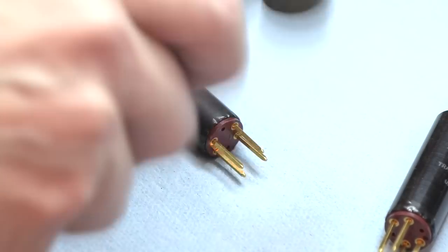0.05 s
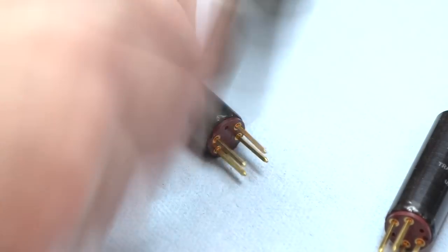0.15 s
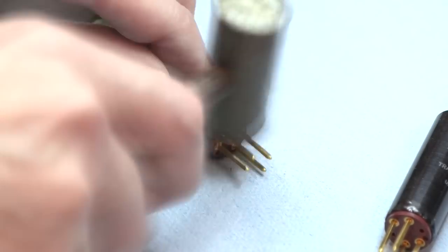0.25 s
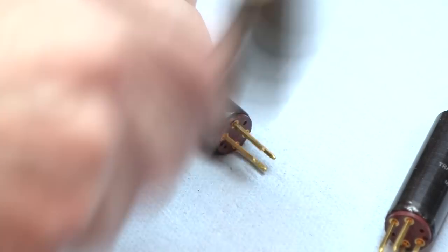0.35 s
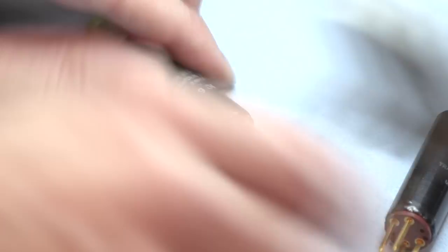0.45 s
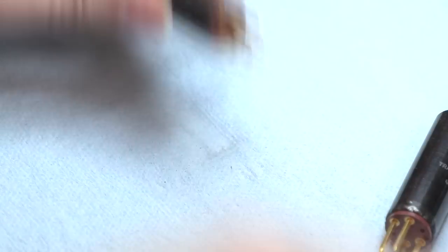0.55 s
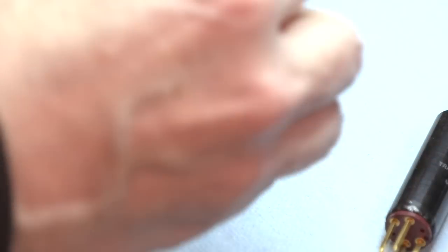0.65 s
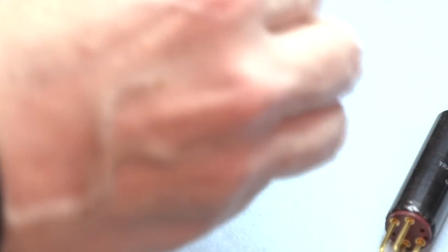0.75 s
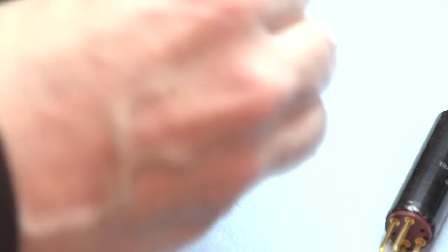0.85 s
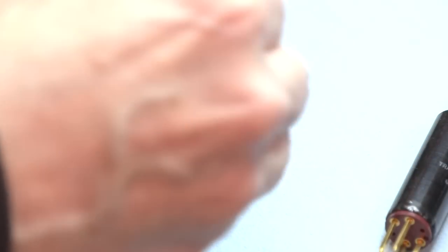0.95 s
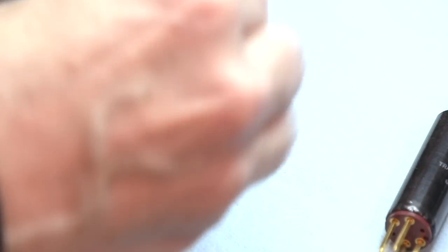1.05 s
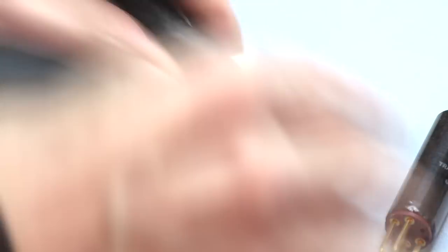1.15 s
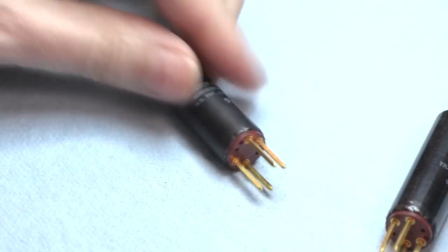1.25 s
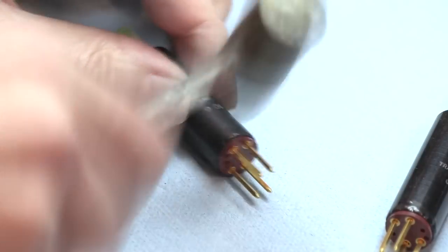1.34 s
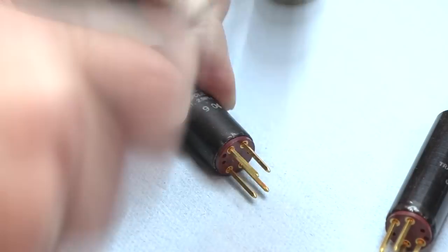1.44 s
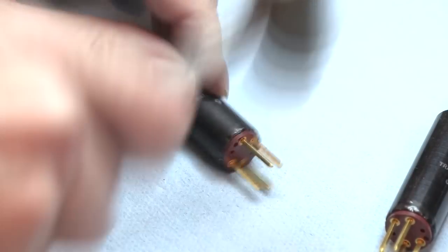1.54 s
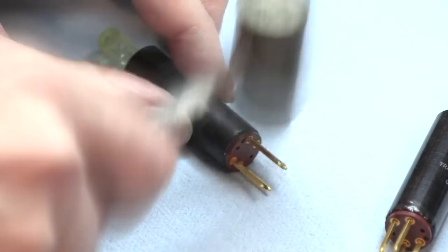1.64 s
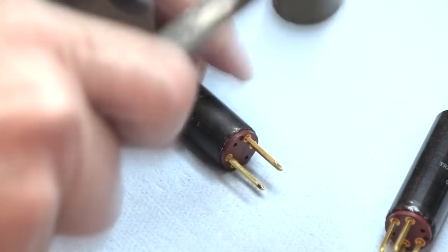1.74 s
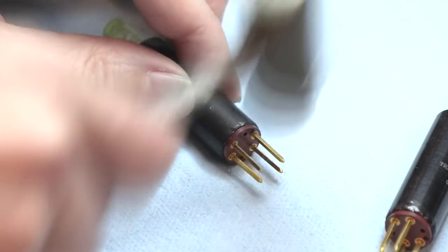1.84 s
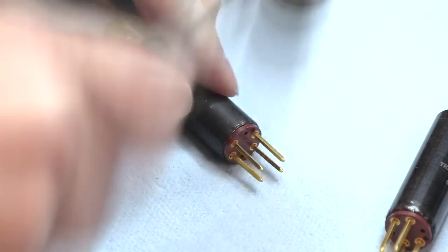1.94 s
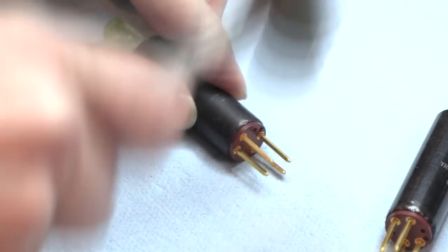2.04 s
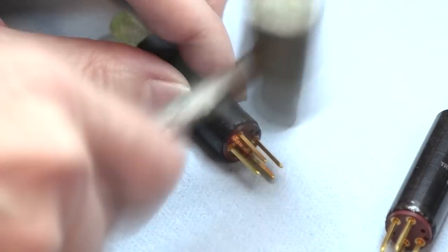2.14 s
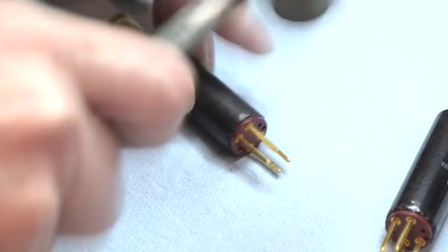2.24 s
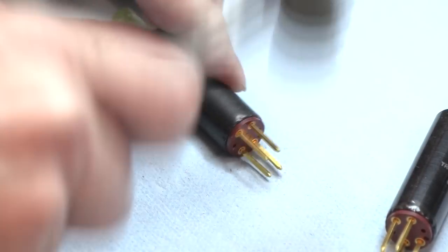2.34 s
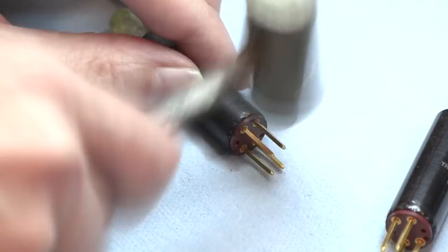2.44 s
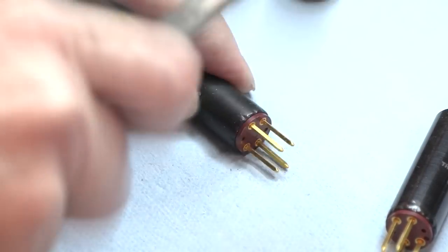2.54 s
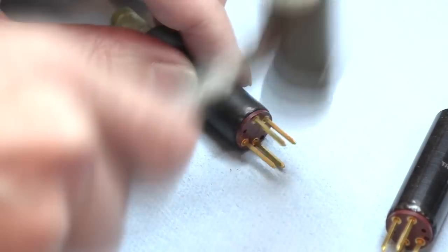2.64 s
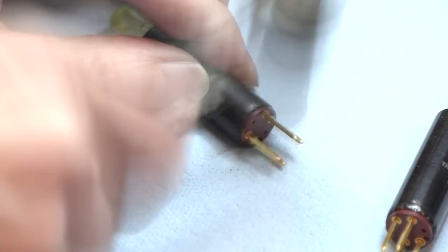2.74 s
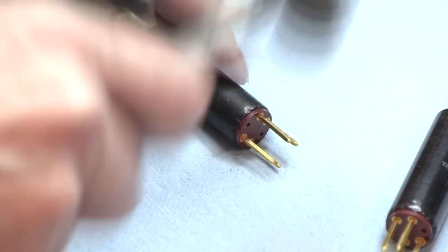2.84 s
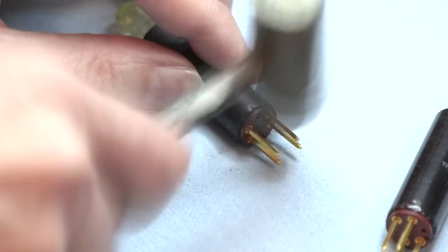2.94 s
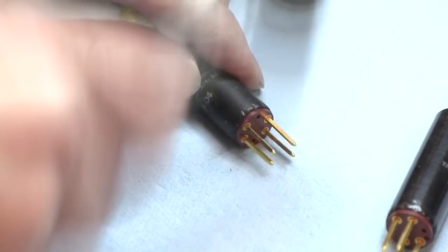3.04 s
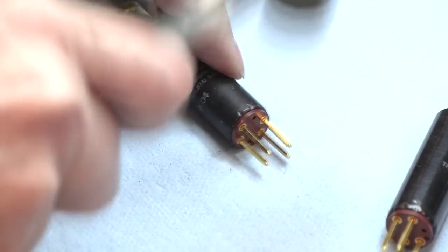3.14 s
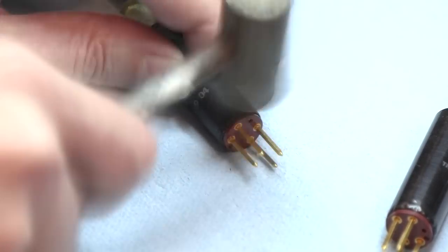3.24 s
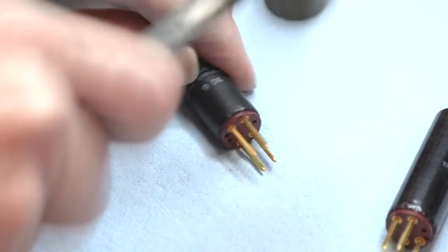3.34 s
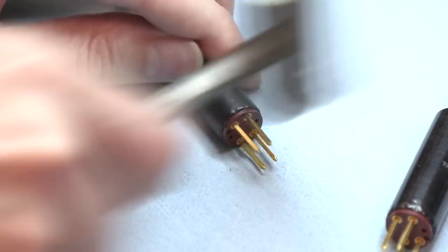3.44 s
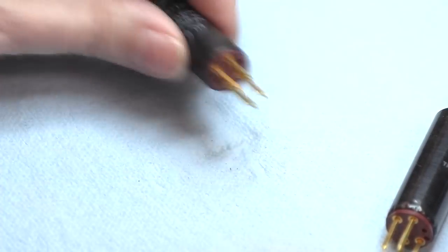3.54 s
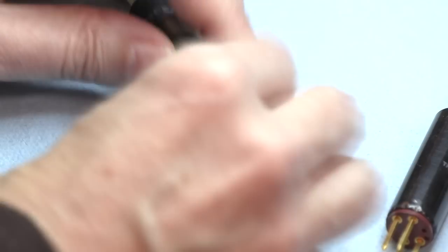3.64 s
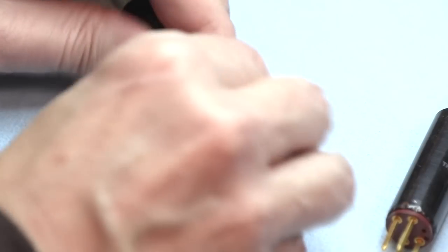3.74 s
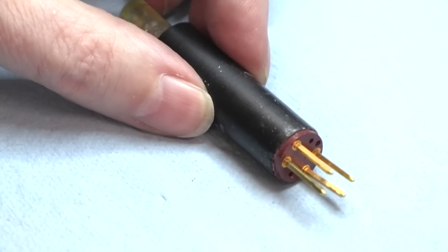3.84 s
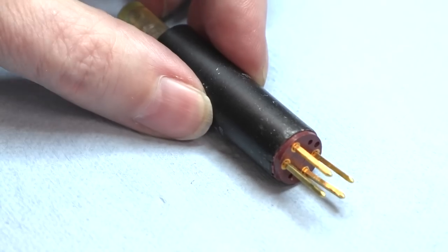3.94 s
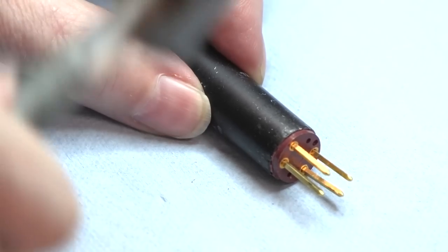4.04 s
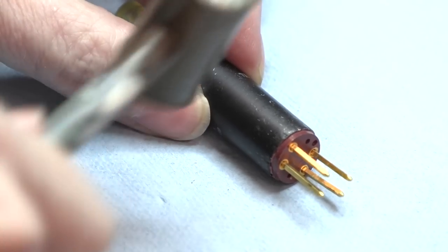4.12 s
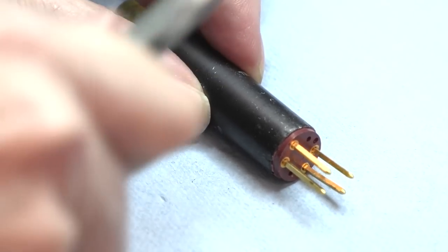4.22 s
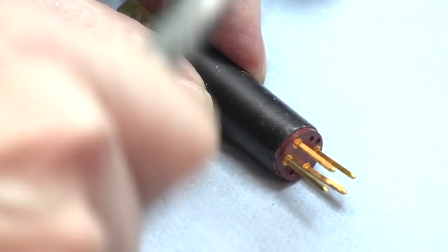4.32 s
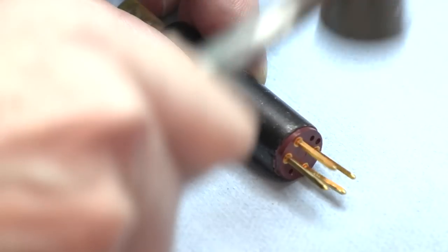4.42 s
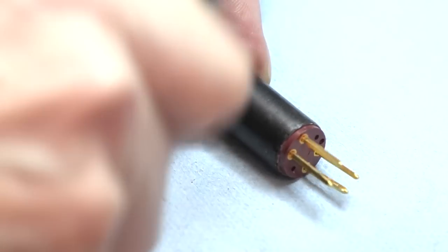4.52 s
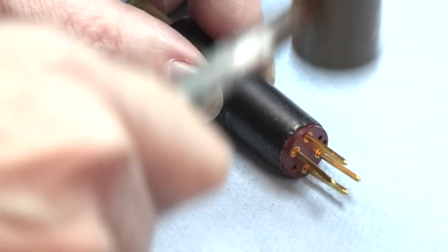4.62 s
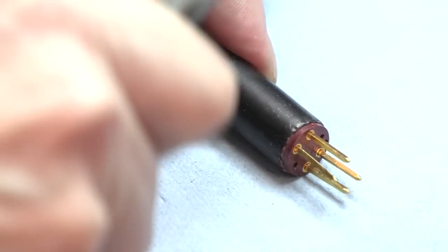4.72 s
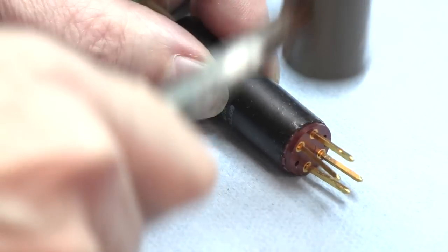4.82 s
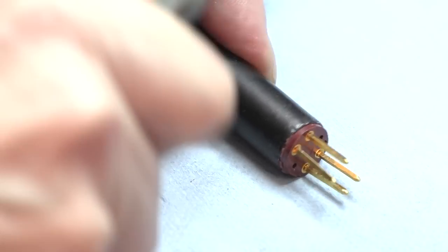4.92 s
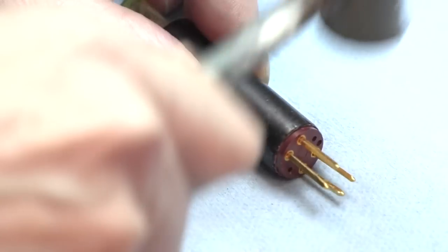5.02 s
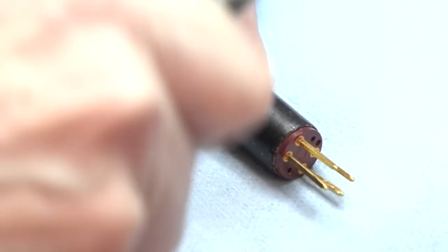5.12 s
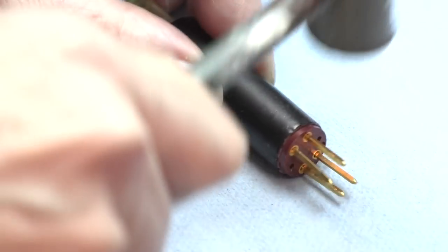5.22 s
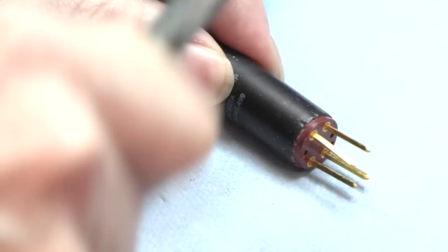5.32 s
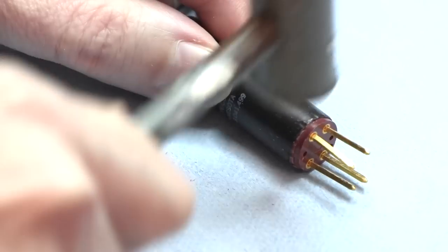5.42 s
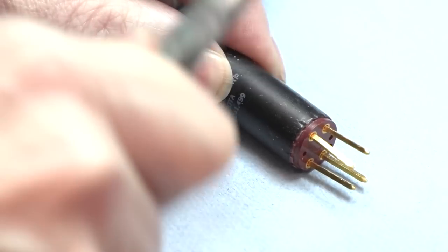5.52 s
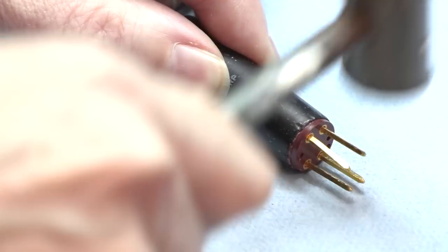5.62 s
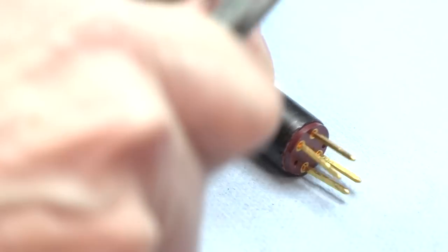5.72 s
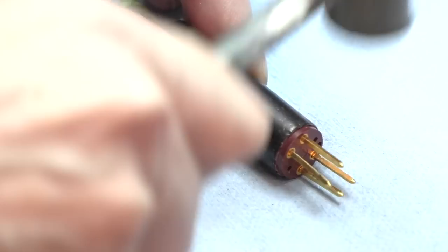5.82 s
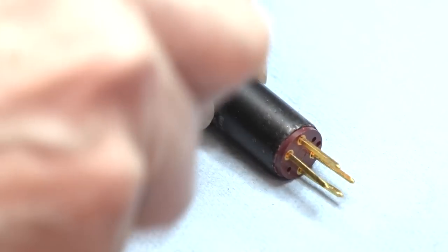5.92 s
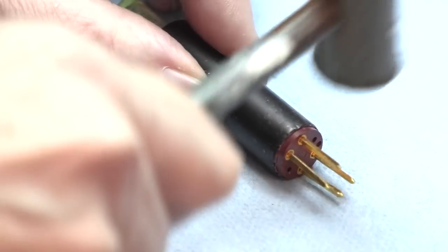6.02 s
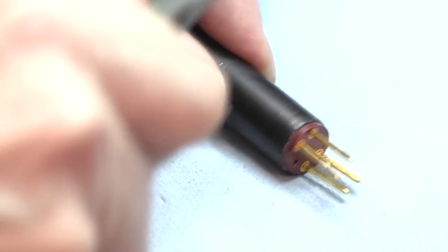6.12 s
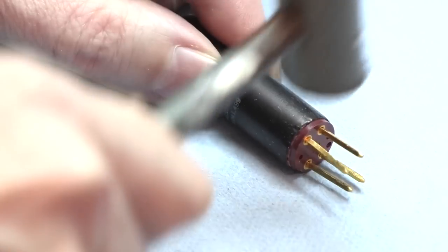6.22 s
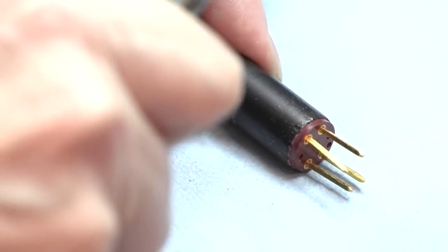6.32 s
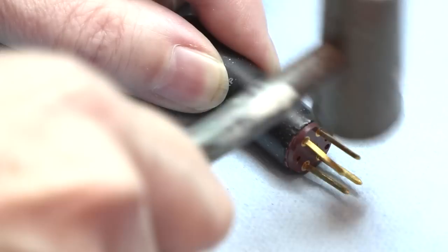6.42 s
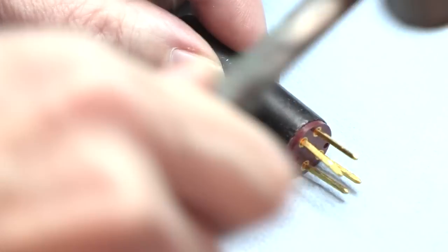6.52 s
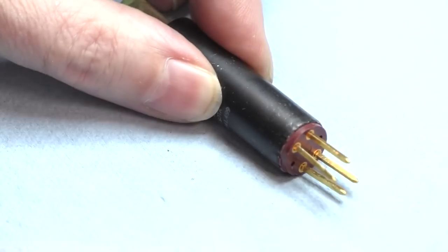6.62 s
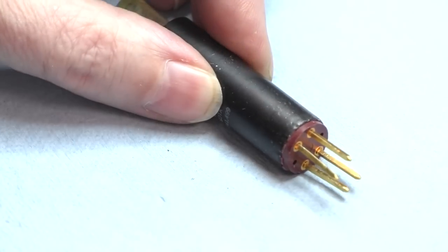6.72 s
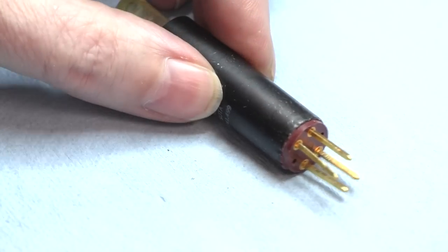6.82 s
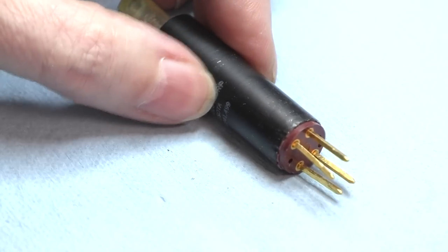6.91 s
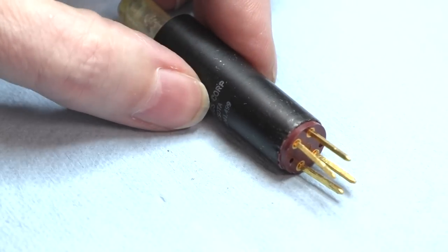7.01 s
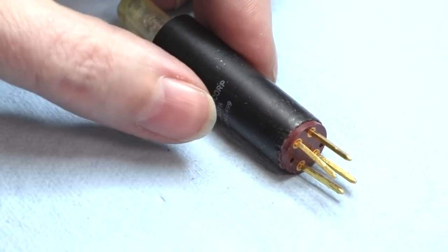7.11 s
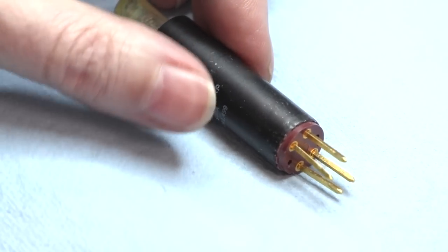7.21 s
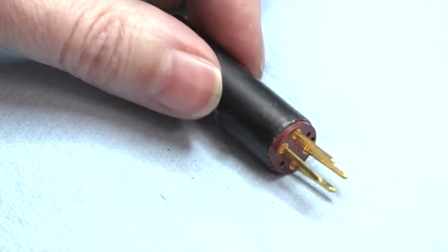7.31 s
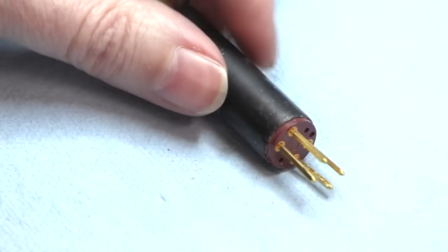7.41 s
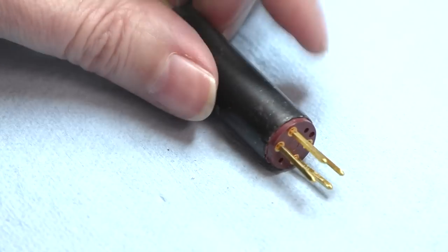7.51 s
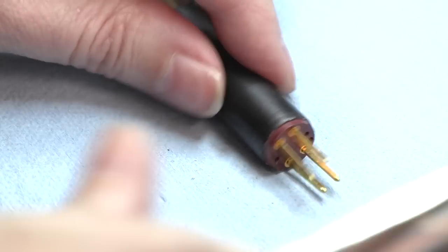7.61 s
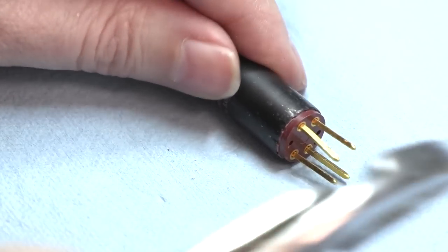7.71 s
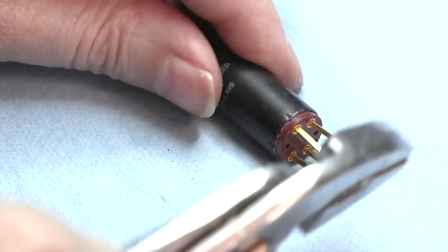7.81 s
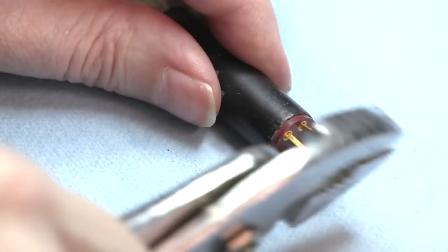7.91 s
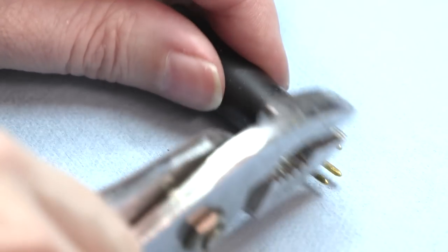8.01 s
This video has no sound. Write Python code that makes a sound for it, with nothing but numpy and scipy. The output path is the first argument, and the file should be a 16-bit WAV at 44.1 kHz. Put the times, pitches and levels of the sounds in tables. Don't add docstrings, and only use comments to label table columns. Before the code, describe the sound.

Frantic sped-up hammer taps on a thin metal tube in two bursts, then eleven loud steady blows, a rattling hammer drop and small plier clicks.

```python
import sys
import numpy as np
from scipy import signal
from scipy.fft import rfft, irfft, next_fast_len
from scipy.io import wavfile
from scipy.ndimage import uniform_filter1d

SR = 44100
rng = np.random.default_rng(int(sys.argv[2]) if len(sys.argv) > 2 else 0)


def store_pcm(level_fs):
    pcm = np.round(np.clip(level_fs, -1, 1) * 32767).astype(np.int16)
    wavfile.write(sys.argv[1], SR, np.atleast_2d(pcm).T)


def invert_db(level):
    return 10 ** (np.asarray(level, dtype=float) / 20)


N = 355435
HOP = 16
TIME = np.arange(N) / SR
STEPS = np.arange(N // HOP + 1) * HOP / SR
BANDS = np.r_[20 * 2 ** (np.arange(17) / 3), 1000 * 2 ** (np.arange(25) / 6)]

# frequency in Hz, width in Hz, level in dB.
HUM = [(124, 13, -63), (430, 10, -52.5)]
# from seconds, to seconds, level in dB.
HUM_CLEAR = [(0.69, 1.228, 1.5), (3.863, 8.1, 1)]
HUM_SPLICED_DB = -4
# frequency in Hz, density in dB per Hz.
SHOP_COLOUR = [(20, -14), (60, -16.5), (90, -27), (125, -5.5), (170, -13), (350, -17.5), (430, -10),
               (520, -15), (1200, -20), (3000, -33), (7000, -44.5), (16000, -54)]
# time in seconds, gain in dB.
SHOP_GAIN = [(0, -4.5), (1.4, -2.5), (3.82, -1.5), (3.86, 4), (6.8, 5), (7.5, 7), (8.06, 4.5)]
SHOP_DB, SHOP_LEFT = -53, 0.09

# start, swell, hold and die in seconds, level in dB.
CLOTH = [(0.577, 0.068, .003, 0.067, -47.5), (1.24, 0.025, 0.1, 0.044, -60),
         (3.563, 0.036, 0.088, 0.04, -51), (3.814, 0.025, 0.22, .6, -58), (7.22, .008, .003, 0.11, -41)]
# frequency in Hz, density in dB per Hz.
CLOTH_COLOUR = [(880, -40), (1500, 7), (1710, 0), (2510, 1), (3380, 4), (6500, 0), (12900, -8),
                (16000, -14)]
# time in seconds, peak in dB.
TICKS = [(0.9854, -61), (1.0535, -58), (1.124, -57), (1.1623, -62), (1.221, -59), (1.2534, -46.5),
         (1.271, -38.5), (1.3088, -41), (7.6128, -49), (7.6569, -55), (7.6831, -49), (7.7674, -56),
         (7.727, -39)]
# frequency in Hz, width in Hz, level in dB.
TICK_RING = [(4630, 860, 6.9), (6160, 920, 11), (9300, 700, 5.1)]
TICK_TAIL_DB, TICK_TAIL_PER_DB = -45, 3

# time in seconds, peak, treble, room tail and bench boom in dB.
KNOCK = [
    (4.222, -29, 0, -39, 0),
]
# frequency in Hz, width in Hz, level in dB.
KNOCK_RING = [(435, 30, 1), (640, 18, 5), (850, 70, -6), (1400, 300, -22)]
# frequency in Hz, density in dB per Hz.
KNOCK_TAIL = [(120, -42), (200, -25.0), (635, -2), (770, -7), (872, -19), (3000, -33), (3900, -65), (6600, -120)]

# time in seconds, peak, treble, room tail and bench boom in dB.
PLIERS = [
    (7.3104, -12, -0.6, -33, 2),
]
# frequency in Hz, width in Hz, level in dB.
PLIER_RING = [(2120, 160, -6.5), (3620, 300, -7), (5900, 74, 1), (6140, 100, 19), (6990, 80, -13),
              (8900, 180, 9), (11000, 170, -12), (13100, 200, -5), (14600, 290, -9)]
# frequency in Hz, density in dB per Hz.
PLIER_TAIL = [(900, -37), (2200, -9), (3500, 2), (5300, -13), (6300, 9.5), (7400, -6.5), (10400, -5.5),
              (14500, -12), (16000, -23)]
# frequency in Hz, level in dB, T60 in seconds.
JAWS = [(6030, -32, .3), (6150, -32, .33), (6290, -31, .3), (6400, -31, .33), (6480, -30, .35),
        (6640, -32, .3), (6820, -34, .25), (6990, -34, .2)]
# time in seconds, peak, treble, room tail and bench boom in dB.
NIPS = [
    (7.9368, -34, -2, -62, 2),
    (7.9543, -25.5, 0.7, -52, 2),
    (8.0175, -37, -2, -67, 2),
    (8.0405, -25.5, 4, -53, 2),
]
# frequency in Hz, width in Hz, level in dB.
NIP_RING = [(2170, 100, 7.5), (3620, 270, -4), (6230, 95, -8), (8900, 120, -14), (9000, 110, -6),
            (9800, 160, -3), (10600, 110, -1), (11300, 110, -9), (12100, 300, -12), (13200, 230, -14),
            (14800, 470, -23)]
# time in seconds, peak, treble, room tail and bench boom in dB.
SNAP = [
    (7.8185, -34.5, 0, -66, 0),
]
# frequency in Hz, width in Hz, level in dB.
SNAP_RING = [(3460, 200, 7), (4300, 500, -8), (5200, 500, -5), (7500, 1500, -16)]

# time in seconds, peak, treble, room tail and bench boom in dB.
DROP = [(6.8687, -4, 0.5, -28, -18), (6.894, -6, 0, -38, -11), (6.916, -8, 2.5, -24.5, 8.5),
        (6.9515, -8, -5, -24.5, -7), (6.975, -12, -17, -23.5, -9), (7.0218, -7, 5.5, -23, 1.5),
        (7.0886, -6.5, -11, -35.5, 19.5), (7.1297, -15, 7, -40, 0), (7.134, -7, -14, -24, 5.5),
        (7.157, -25, 12.5, -34, -3), (7.1695, -10, -11, -25, 4), (7.195, -14, -1, -26.5, 3),
        (7.2145, -23, -14, -35, 3), (7.224, -13, -14, -25.5, 5), (7.2385, -15, -11, -39, 6),
        (7.2485, -18, -9, -34, 4), (7.262, -12.5, -10, -37, -3), (7.276, -24, -8, -45, -3)]
# frequency in Hz, width in Hz, level in dB.
DROP_RING = [(680, 110, -14), (1567, 82, 9.5), (2620, 570, -2), (3380, 200, -18), (3800, 250, -2),
             (4540, 80, -1.5), (5800, 220, -17), (7270, 76, -21), (7700, 180, -36), (8260, 170, -38),
             (11300, 160, -42)]
# frequency in Hz, density in dB per Hz.
DROP_TAIL = [(60, -60), (100, -36.5), (570, -2.5), (870, -1.5), (1650, 0), (2600, -4.5), (3900, -8.5),
             (4700, -12.5), (5800, -20.5), (7500, -31.5), (8600, -36), (10500, -54), (16000, -61)]
DROP_LAG_S = 0.00218
# time in seconds, level in dB.
ROLL = [(6.86, -53), (6.87, -21), (6.91, -14.5), (7.086, -36), (7.088, -17.5), (7.266, -31), (7.304, -28),
        (7.5, -33)]
ROLL_ENDS_S = 7.27
HANDLE_HZ = [588, 695, 824, 1057, 1113, 1350, 1487, 1531, 1642, 2031, 2205, 2385, 2840, 3002, 11200, 15700]
# level in dB, T60 in seconds.
HANDLE = [(-31, 0.55), (-41, 0.26), (-30, .3), (-35, .4), (-27, 0.66), (-20.5, 0.25), (-22.5, 0.33),
          (-32, 0.22), (-19.5, 0.5), (-20, 0.27), (-32, 0.21), (-24, .2), (-25.5, .2), (-26.5, 0.19),
          (-54, .17), (-56, .15)]
# frequency in Hz, level in dB, T60 in seconds.
HEAD = [(2646, -35, .5), (2651, -40, .35), (4597, -28, .18), (7100, -40, .14), (7720, -35, .17)]
HAMMER = [(hz, *row) for hz, row in zip(HANDLE_HZ, HANDLE)] + HEAD
# frequency in Hz, level in dB, T60 in seconds.
CHIME = [(2639, -38, .2), (2637, -44.5, 1.6), (2634.9, -55, 4.)]
CHIME_S = 7.384
SETTLE_S, SETTLE_DB = 7.29, 2

# time in seconds, peak in
# dB, room tail in dB.
ONCE = [(0.1697, -16, -59), (0.2574, -24, -70), (2.508, -12, -36.5), (2.392, -12.5, -38.5),
        (2.4467, -14, -35), (2.759, -15.5, -36.5), (2.823, -14.5, -36.5), (2.8868, -15.5, -36),
        (2.9491, -16, -37.5), (3.0675, -13, -37), (3.2435, -14, -35)]
# early copy in seconds, early copy, late copy and room tail in dB.
TWICE = [(0.0001, -15.5, -15.5, -33), (0.0745, -10.5, -12, -30.5), (0.1402, -36, -7.5, -29),
         (0.2267, -22.5, -9.5, -29.5), (0.3102, -17, -10, -29.5), (0.3865, -25.5, -11, -30.5),
         (0.4593, -49, -11, -27.5), (1.453, -41, -13, -36.5), (1.524, -10.5, -20, -32.5),
         (1.572, -37, -10, -36), (1.6424, -18.5, -11.5, -34.5), (1.7681, -12, -22, -34),
         (1.8293, -14, -18, -35), (1.885, -24, -12.5, -36), (2.0218, -14.5, -16.5, -34.5),
         (2.1451, -19.5, -14.5, -35), (2.321, -28, -11, -36), (2.5583, -22, -11, -37.5),
         (2.6243, -21, -15, -36.5), (2.6833, -33, -15.5, -37), (2.2071, -15.5, -16, -33.5),
         (2.2664, -16, -16, -36), (3.003, -13.5, -18, -36), (3.1234, -13.5, -21, -37),
         (3.1785, -16, -16, -35.5), (3.3069, -15, -17, -35), (3.3665, -17.5, -14.5, -36.5),
         (3.4231, -22, -14.5, -37.5), (3.4812, -39, -14, -35.5), (1.699, -39, -9.5, -34),
         (1.9449, -35, -13, -35.5), (2.0876, -13, -21, -33.5), (2.377, -31, -37, -47)]
# time in seconds, peak, treble, room tail and bench boom in dB.
LAID = [(0.5868, -32, -8.5, -39.5, -2), (0.619, -28, -2.5, -48, 12), (0.635, -18.5, -4, -46.5, 16),
        (3.5896, -34, -2, -40.5, 0.6), (3.6054, -27, 1, -43, -3), (3.6219, -24, 6, -44, 12)]
# frequency in Hz, width in Hz, level in dB.
QUICK_RING = [(284, 720, -11), (1165, 240, 10), (2130, 600, 10.5), (3186, 130, 8), (4530, 1100, 3.5),
              (5380, 150, 11), (7190, 910, 8.5), (8420, 290, 4.5), (9030, 300, 2), (11250, 720, -4.5),
              (11600, 360, -16), (13170, 260, -2), (5000, 4600, -13)]
# frequency in Hz, width in Hz, level in dB.
FIRST_TOP = [(13900, 3600, 2)]
# frequency in Hz, density in dB per Hz.
QUICK_TAIL = [(40, -34), (70, -2), (270, -4), (430, -10.5), (570, -14), (970, -7.5), (1780, -7.5),
              (2300, -5.5), (3300, -7), (4500, -4), (6800, -4), (9000, -10), (12700, -18), (16000, -25)]
# frequency in Hz, density in dB per Hz.
FIRST_TAIL_TOP = [(9000, -4.5), (12700, -4), (16000, -19)]
# frequency in Hz, level in dB, T60 in seconds.
QUICK_WALL = [(1198, -23.5, 0.037), (1770, -30.5, 0.066), (1993, -30, 0.043), (2820, -31, 0.047),
              (4060, -30.5, 0.051), (4560, -36, 0.068), (4870, -36.5, 0.063), (5400, -28, 0.032),
              (6180, -29.5, 0.051), (6700, -33, 0.041), (7300, -28.5, 0.041)]
TURN_S, SPLICE_S = 1, 0.016
RUN_TREBLE_DB, RUN_BOOM_DB, REPEAT_TREBLE_DB = (-6, -0.85), (1, 0.7), -3.5
FULL_DB, TAIL_PER_DB, EARLY_MOST = -15, 0.57, 0.92
LONE_DB = -90

# time in seconds, peak, treble and room tail in dB.
BLOWS = [(4.441, 2.5, -2.5, -23.5), (4.6587, -0.5, -0.5, -24.5), (4.866, 0, -0.5, -24),
         (5.057, 0.5, -1, -22), (5.2533, 1, -1.3, -22), (5.4496, -0.3, -0.2, -26)]
# time in seconds, peak, treble and room tail in dB.
DENTED = [(5.6516, -1, -1.8, -24), (5.8495, -1, -2.5, -22), (6.063, -1.1, -3, -20), (6.2613, -2, -0.5, -22),
          (6.462, -1, -2, -19.5)]
# frequency in Hz, width in Hz, level in dB.
BLOW_RING = [(1110, 350, 1.5), (1797, 160, 8), (2180, 310, 5), (2640, 780, 6), (4135, 160, 0.5),
             (4640, 290, 3), (5900, 150, -6.5), (6690, 120, -5.5), (8140, 750, -12), (11800, 500, -25),
             (13200, 900, -24), (15000, 1000, -24)]
# frequency in Hz, width in Hz, level in dB.
DENTED_RING = [(630, 260, -7), (1152, 96, -0.5), (1775, 145, 0), (2230, 230, -2), (2790, 260, -3.5),
               (4043, 220, -1.5), (5710, 85, -5.5), (7080, 210, -14.5), (8830, 370, -11.5),
               (12130, 300, -24), (13050, 230, -16), (14800, 360, -24)]
# frequency in Hz, density in dB per Hz.
LOW_TAIL = [(40, -40), (70, -16), (180, -19), (268, -11), (400, -17), (590, -14)]
# frequency in Hz, density in dB per Hz.
BLOW_TAIL = [(820, -16.5), (1700, -14), (2650, -8.5), (3000, -19.5), (3600, -17), (4100, -13),
             (4800, -12.5), (6000, -18.5), (8500, -25), (10300, -31), (13300, -24), (16000, -31)]
# frequency in Hz, density in dB per Hz.
DENTED_TAIL = [(785, -14), (2000, -12), (3040, -15.5), (4640, -11), (8320, -21.5), (10300, -24),
               (13300, -21.5), (16000, -27)]
# frequency in Hz, level in dB, T60 in seconds.
WALL = [(975, -44.5, 0.32), (1604, -34.5, 0.23), (1790, -44, 0.37), (2200, -44, 0.46), (2540, -46, 0.58),
        (2760, -44, 0.2), (3980, -50, 0.52), (4070, -52, 0.44), (4560, -55, .3), (4780, -43.5, 0.34),
        (5200, -45, 0.19), (5560, -49, 0.17), (6340, -57, 0.14), (6590, -47, .2)]
BOOM_FROM_DB, BOOM_DB_PER_S = -2, 3.5
# frequency in Hz, level over room tail in dB, T60 in seconds.
SWELL = [(268, -1, .42), (312, -10, .3), (588, -6, .3)]
SWELL_LAG_S, SWELL_RISE_S = 0.019, 0.15

# frequency in Hz, level in dB, T60 in seconds.
BENCH = [(127.2, -9, 0.41), (269, 1.5, 0.36), (436.6, -10, 0.24), (581.4, -3, 0.25)]
BENCH_LAG_S = 0.00486
BENCH_DUCK = 0.64
# frequency in Hz, T60 in seconds.
ROOM_T60 = [(100, 0.42), (260, 0.72), (700, 0.45), (1840, 0.41), (4850, 0.33), (12800, 0.26)]
FLIGHT_S, RING_SCATTER_DB, RUB_RANGE_DB = 0.0013, 3, 30


def read(table, x):
    hz, value = np.array(table).T[:2]
    return np.interp(np.log(x), np.log(hz), value)


def curve(table, at=STEPS):
    return invert_db(np.interp(at, *np.transpose(table), left=-200, right=-200))


def shares(colour):
    power = invert_db(2 * read(colour, BANDS)) * np.gradient(BANDS)
    return power / power.sum()


def train(seconds, sizes, at=TIME):
    x = np.zeros(len(at))
    np.add.at(x, np.minimum(np.searchsorted(at, seconds), len(at) - 1), sizes)
    return x


def fade(x, t60):
    return signal.lfilter([1], [1, -1000 ** (-HOP / (t60 * SR))], x)


def width_t60(width_hz):
    return np.log(1000) / np.pi / width_hz


def ring(x, hz, t60):
    w = 2 * np.pi * hz / SR
    out = np.zeros(len(x))
    hits = np.flatnonzero(x)
    heard = slice(hits[0], hits[-1] + int(1.5 * t60 * SR))
    for sign, t in ((1, t60), (-1, 3 / hz)):
        r = 1000 ** (-1 / (t * SR))
        out[heard] += sign * signal.lfilter([0, r * np.sin(w)], [1, -2 * r * np.cos(w), r * r], x[heard])
    return out


def band_noise():
    size = next_fast_len(N)
    spectrum = rfft(rng.standard_normal(size))
    hz = np.arange(len(spectrum)) * SR / size
    step = np.interp(hz, np.r_[0, BANDS, SR / 2], np.arange(-1, len(BANDS) + 1))
    out = []
    for k in range(len(BANDS)):
        window = np.cos(np.pi / 2 * np.clip(step - k, -1, 1))
        out.append(irfft(spectrum * window, size)[:N])
    out = np.array(out)
    return out / out.std(axis=1, keepdims=True)


def strikes(table, contact, colour, pace, crack_db, crack_s, duck_s, boom_db, scatter_db, rings=(), lag_s=0):
    s, peak_db, treble_db, tail_db, low_db = np.transpose(table)
    s = s + FLIGHT_S

    def treble(hz):
        return treble_db * np.clip(np.log2(hz / 2500), 0, 2)

    def luck(db):
        return db * rng.standard_normal(len(s))

    hz, width, db = np.transpose(contact)
    size = (-1) ** np.arange(len(hz)) * invert_db(db) * width
    modes = list(zip(size, hz, width_t60(width)))
    unit = np.abs(sum(ring(a * (TIME[:400] == 0), f, t) for a, f, t in modes)).max()
    wave = np.zeros(N)
    for a, f, t in modes:
        level_db = peak_db + treble(f) + low_db * (f < 800) + luck(scatter_db)
        wave += ring(train(s + lag_s * (f < 2000), a / unit * invert_db(level_db)), f, t)
    for f, d, t in rings:
        wave += ring(train(s, invert_db(peak_db + d + luck(RING_SCATTER_DB))), f, t)

    thump = train(s + BENCH_LAG_S * (s < 8), invert_db(tail_db + low_db + boom_db))
    for f, d, t in BENCH:
        wave += invert_db(d) * (ring(thump, f, t / pace) - BENCH_DUCK * ring(thump, f, 3 * duck_s))

    power = []
    for f, share in zip(BANDS, shares(colour)):
        tint_db = luck(scatter_db) + treble(f)
        tail = train(s, share * invert_db(2 * (tail_db + tint_db + low_db * (f < 800))), STEPS)
        late = fade(tail, read(ROOM_T60, f) / pace / 2)
        late = np.maximum(late - fade(tail, duck_s), 0)
        crack = train(s, share * invert_db(2 * (peak_db + crack_db + tint_db)), STEPS)
        power.append(late + fade(crack, crack_s))
    return wave, np.array(power)


def shop():
    hum = np.zeros(N)
    for hz, width_hz, db in HUM:
        z = np.repeat(fade(rng.standard_normal(len(STEPS)), 2 / width_hz), HOP)[:N]
        z = uniform_filter1d(z, size=1000) / z.std()
        hum += invert_db(db) * (1 + 0.056 * z) * np.sin(2 * np.pi * hz * TIME + 0.32 * z)
    gain_db = np.full(N, float(HUM_SPLICED_DB))
    for start, end, db in HUM_CLEAR:
        gain_db[(TIME > start) & (TIME < end)] = db
    air = shares(SHOP_COLOUR)[:, None] * (curve(SHOP_GAIN) * invert_db(SHOP_DB)) ** 2
    return invert_db(uniform_filter1d(gain_db, size=3000)) * hum, air


def cloth():
    power = 0
    for row in CLOTH:
        corners_s = np.cumsum(row[:4])
        level_db = row[4] - RUB_RANGE_DB * np.array([1, 0, 0, 1])
        power = power + curve(np.c_[corners_s, level_db]) ** 2
    return 0, power * shares(CLOTH_COLOUR)[:, None]


def light_ticks():
    table = [(s, db, 0, TICK_TAIL_DB + TICK_TAIL_PER_DB * db, 0) for s, db in TICKS]
    return strikes(table, TICK_RING, CLOTH_COLOUR, pace=3.0, crack_db=-12.0, crack_s=0.014,
                   duck_s=0.004, boom_db=-30, scatter_db=4.2)


def knock():
    return strikes(KNOCK, KNOCK_RING, KNOCK_TAIL, pace=2.3, crack_db=-16.0, crack_s=0.018,
                   duck_s=0.01, boom_db=-27.0, scatter_db=0.1)


def pin_snap():
    return strikes(SNAP, SNAP_RING, CLOTH_COLOUR, pace=3.0, crack_db=-17, crack_s=0.015,
                   duck_s=0.004, boom_db=-30, scatter_db=1.5)


def plier_nips():
    return strikes(NIPS, NIP_RING, PLIER_TAIL, pace=1.23, crack_db=-10.5, crack_s=0.023,
                   duck_s=0.0092, boom_db=-20, scatter_db=3.3)


def plier_pickup():
    return strikes(PLIERS, PLIER_RING, PLIER_TAIL, pace=1.07, crack_db=-3.5, crack_s=0.016,
                   duck_s=0.0092, boom_db=-27, scatter_db=0.73, rings=JAWS)


def head_chime():
    wave = np.zeros(N)
    for hz, db, t60 in CHIME:
        settle = invert_db(SETTLE_DB) * (hz > 2638)
        wave += invert_db(db) * ring(train([SETTLE_S, CHIME_S], [settle, 1.0]), hz, t60)
    return wave, 0


def hammer_roll():
    rolling = (TIME > ROLL[0][0]) & (TIME < ROLL_ENDS_S)
    hits = rng.random(N) < 300 / SR
    clicks = hits * invert_db(0.67 * rng.standard_normal(N)) * curve(ROLL, TIME) * rolling
    clicks = np.convolve(clicks, np.hanning(5) / 2)[:N]
    top = sum(invert_db(db) * w / 300 * ring(clicks, hz, width_t60(w)) for hz, w, db in DROP_RING)
    handle = sum(invert_db(db) * ring(clicks, hz, t60) for hz, db, t60 in HAMMER)
    scrape = shares(DROP_TAIL)[:, None] * (curve(ROLL) * invert_db(-25)) ** 2
    return invert_db(-16) * top + invert_db(3) * handle, scrape


def hammer_drop():
    return strikes(DROP, DROP_RING, DROP_TAIL, pace=0.69, crack_db=-10.0, crack_s=0.039,
                   duck_s=0.093, boom_db=-36, scatter_db=1.2, rings=HAMMER, lag_s=DROP_LAG_S)


def quick_table():
    lone = [(s, db, LONE_DB, tail) for s, db, tail in ONCE]
    s, early, late, tail = np.transpose(TWICE + lone)
    share = EARLY_MOST * invert_db(2 * TAIL_PER_DB * np.minimum(early - FULL_DB, 0))
    run = np.r_[s > TURN_S, s > TURN_S].astype(int)
    times = np.r_[s, s + SPLICE_S]
    peaks = np.r_[early, late]
    treble = np.take(RUN_TREBLE_DB, run) + REPEAT_TREBLE_DB * np.r_[0 * share, share]
    tails = np.r_[tail + 10 * np.log10(share), tail + 10 * np.log10(1 - share)]
    return np.r_[np.c_[times, peaks, treble, tails, np.take(RUN_BOOM_DB, run)], LAID]


def quick_taps():
    taps = quick_table()
    first = taps[:, 0] < TURN_S
    before = strikes(taps[first], QUICK_RING + FIRST_TOP, QUICK_TAIL[:-3] + FIRST_TAIL_TOP, pace=2.58,
                     crack_db=-14.5, crack_s=0.0067, duck_s=0.0029, boom_db=-7.0, scatter_db=2.6, rings=QUICK_WALL)
    after = strikes(taps[~first], QUICK_RING, QUICK_TAIL, pace=2.55,
                    crack_db=-17.0, crack_s=0.0068, duck_s=0.0034, boom_db=-5.5, scatter_db=1.66, rings=QUICK_WALL)
    return before[0] + after[0], before[1] + after[1]


def with_boom(table):
    return [(*row, BOOM_FROM_DB + BOOM_DB_PER_S * (row[0] - BLOWS[0][0])) for row in table]


def bench_swell():
    s, _, _, tail_db, low_db = np.transpose(with_boom(BLOWS + DENTED))
    push = train(s + SWELL_LAG_S, invert_db(tail_db + low_db))
    wave = sum(invert_db(db) * (ring(push, hz, t60) - ring(push, hz, SWELL_RISE_S)) for hz, db, t60 in SWELL)
    return wave, 0


def full_blows():
    tube = strikes(with_boom(BLOWS), BLOW_RING, LOW_TAIL + BLOW_TAIL, pace=0.96, crack_db=-18.5,
                   crack_s=0.018, duck_s=0.12, boom_db=-7, scatter_db=1.3, rings=WALL)
    flat = strikes(with_boom(DENTED), DENTED_RING, LOW_TAIL + DENTED_TAIL, pace=0.93, crack_db=-14.0,
                   crack_s=0.012, duck_s=0.13, boom_db=-9, scatter_db=1.1, rings=WALL)
    return tube[0] + flat[0], tube[1] + flat[1]


def scene():
    hum, air = shop()
    parts = [(hum, air), cloth(), light_ticks(), knock(), pin_snap(), plier_nips(), plier_pickup(),
             head_chime(), hammer_roll(), hammer_drop(), quick_taps(), bench_swell(), full_blows()]
    wave = sum(p[0] for p in parts)
    power = sum(p[1] for p in parts)
    for k, hz in enumerate(BANDS):
        half = int(SR / HOP / hz / 2)
        power[k] = uniform_filter1d(power[k], size=1 + 2 * half, origin=half)
    spread = np.repeat(np.sqrt(power), HOP, axis=1)[:, :N]
    spread = uniform_filter1d(spread, size=2 * HOP, axis=1)
    airy = np.repeat(air / power, HOP, axis=1)[:, :N]
    noise = band_noise()
    bands = spread * noise
    mid = wave + bands.sum(axis=0)
    wide = np.sum((BANDS[:, None] / 1000) ** 0.054 * spread * noise[:, ::-1], axis=0)
    side = invert_db(-24.0) * wide + invert_db(-29) * mid
    side += SHOP_LEFT * (hum + np.sum(airy * bands, axis=0))
    return np.array([mid + side, mid - side])


def band_limit(x):
    return signal.sosfilt(signal.butter(12, 16860, fs=SR, output="sos"), x)


def record(dry):
    soft = dry / (1 + np.abs(dry) ** 6) ** (1 / 6)
    lowpass = signal.ellip(8, 0.3, 60, 16300, fs=SR, output="sos")
    dull = signal.sosfilt(lowpass, soft)
    return band_limit(dull)


dry = scene()
out = record(dry)
store_pcm(out)
```